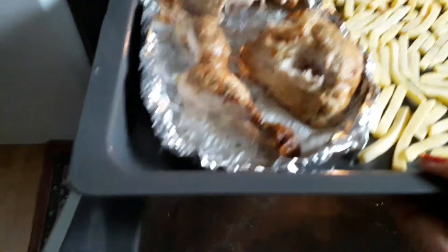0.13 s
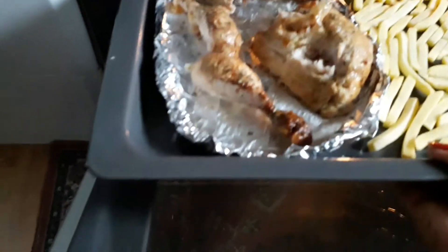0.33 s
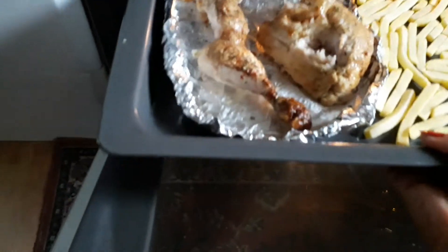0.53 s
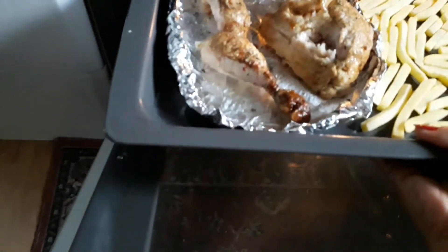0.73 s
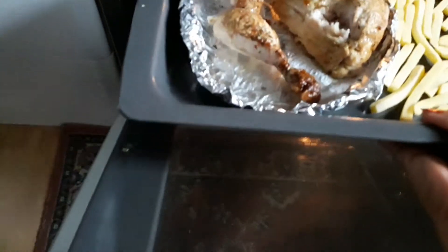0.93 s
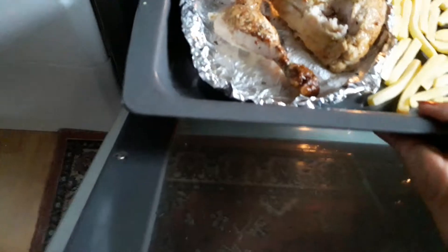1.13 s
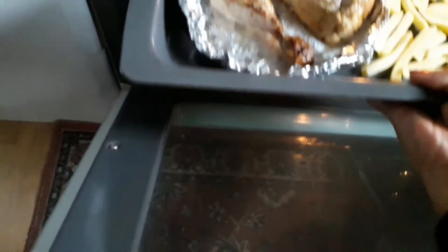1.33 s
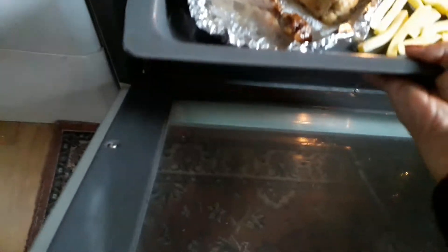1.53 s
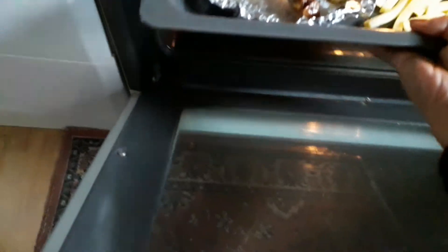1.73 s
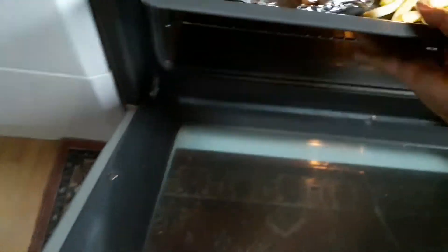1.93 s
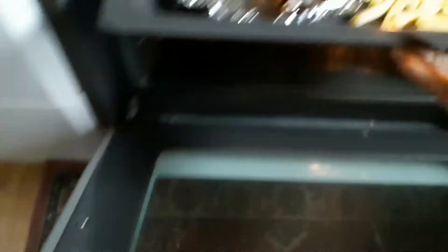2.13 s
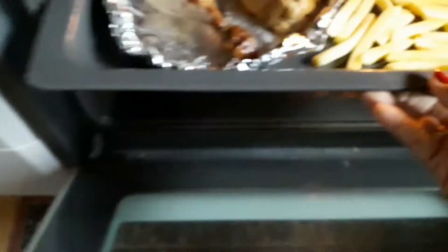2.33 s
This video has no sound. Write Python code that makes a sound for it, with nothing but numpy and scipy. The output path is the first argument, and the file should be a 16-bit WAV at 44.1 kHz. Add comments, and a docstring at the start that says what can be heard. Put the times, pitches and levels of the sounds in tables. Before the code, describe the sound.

Close up in a kitchen, a heavy sheet-metal tray bumps oven runners several times, clanks down hard, rattles faintly, then scrapes along with low rumble and rasp that end as bright gritty hiss over faint room rumble.

```python
"""A loaded metal baking tray is fed into an oven, heard close up on one small microphone.
Its rim knocks and rattles on the side runners, drops onto them with one loud clank and settles: each
blow sums dying sines and a decaying noisy crash. Then it slides in with a rumbling rasp that thins out
to a fine, gritty hiss, all three made of random tiny slips. The oven walls return short treble echoes,
and a faint room rumble lies beneath. Both channels are the same."""
import sys
import numpy as np
from scipy import signal
from scipy.fft import rfft, irfft
from scipy.io import wavfile

SR = 44100
rng = np.random.default_rng(int(sys.argv[2]) if len(sys.argv) > 2 else 0)


def persist_wave(psi):
    """Save psi, clipped to +-1, as 16-bit WAV."""
    counts = np.round(np.clip(psi, -1, 1) * 32767).astype(np.int16)
    wavfile.write(sys.argv[1], SR, np.atleast_2d(counts).T)


N = 105840

# Knocks of the rim on the runners; the four levels apply before the rise and decay:
# start_s, boom_db, clank_db, clash_db, tick_db, thump_pitch_hz, ping_pitch_hz, ping_level_db
KNOCKS = [(0.001, -31, -35, -41, -49, 325, 3330, -43), (0.029, -34.5, -38, -41.5, -48.5, 440, 2920, -44),
          (0.058, -29, -29, -31, -34.5, 336, 1070, -26), (0.1182, -28.5, -30.5, -44, -46, 201, 1090, -38),
          (0.2139, -24, -24, -35, -35, 329.3, 1840, -29.5),
          (0.2342, -26, -24.5, -26.5, -33, 345, 3330, -51), (0.2637, -22, -28, -24, -28.5, 268, 4540, -40),
          (0.294, -38, -64, -42, -41, 203, 9850, -38.5), (0.3414, -31, -34.5, -43.5, -63, 186, 1810, -40),
          (0.497, -12.5, -18.5, -19.5, -18, 240.7, 1370, -23),
          (0.5, -16.5, -24.5, -20.5, -27, 107.8, 3280, -22.5), (0.518, -28, -23, -36, -26, 246, 10300, -29),
          (0.525, -22.5, -31, -25, -25.5, 123, 2495, -15), (0.553, -37, -49, -36, -36, 236, 2570, -33),
          (0.588, -34.5, -39.5, -42.5, -38.5, 120, 9400, -45), (0.723, -61, -52, -77, -52, 237, 2760, -51),
          (0.8731, -25.5, -43, -30.5, -40, 172, 2290, -32.5), (0.892, -42, -32, -48, -38, 363, 3640, -36),
          (0.9148, -30, -36, -41, -40.5, 113, 2730, -42), (0.981, -34.5, -36.5, -66, -58, 193, 1460, -35),
          (1.0127, -48, -40.5, -35, -40.5, 122, 3840, -48), (1.109, -45, -50, -49.5, -46, 190, 3880, -45),
          (1.123, -40.5, -46, -38, -58, 171, 3870, -40.5), (1.2868, -77, -73, -49.5, -40, 214, 3430, -51),
          (1.648, -46, -65, -69, -60, 160, 1540, -68), (1.696, -58, -45, -46, -48, 112, 2130, -41.5),
          (1.975, -51, -54, -70, -56, 193, 1527, -46.5)]
# Boom, clank, clash and tick ranges of a crash:
# low_edge_hz, high_edge_hz, rise_s (time constant), first_t60_s, tail_level_db, tail_t60_s
CRASH_RANGES = [(80.3, 792, 0.0026, 0.25, -15, 0.62), (608, 3100, 0.00054, 0.045, -6, 0.2),
                (2600, 5820, 0.0014, .06, -9, 0.19), (6310, 46000, 0.00028, 0.033, -8, 0.16)]
# Colour of the dense ringing of tray and oven walls: pitch_hz, relative_level_db (per Hz)
SHEET_COLOUR = [(40, -21.5), (115, -0.5), (170, 0), (270, -5), (390, -8.5), (540, -9.5), (680, -22),
                (1000, -12.5), (1400, -13.5), (2000, -18.5), (2700, -18), (3800, -16.5), (5200, -20.5),
                (7500, -24), (10000, -22), (15500, -34.5)]
# Bending modes of the loaded tray: pitch_hz, level_db, t60_s
BENDING_MODES = [(104.2, -7.5, 0.15), (125.15, -8, 0.51), (141.4, -13, 0.31), (187.4, -22, 1),
                 (223.7, -15, 0.62), (233.5, -16.5, 0.54), (245.4, -9.5, 0.29), (280.7, -18.5, 0.56),
                 (350.3, -13, 0.29), (422.3, -17.5, .35), (547.2, -9.5, .22), (569.7, -17.5, .2)]
# Higher modes of the sheet and its rim: pitch_hz, level_db, t60_s
CLANG_MODES = [(972, -25.5, 0.14), (1111, -15.5, 0.19), (1198, -24.5, 0.19), (1315, -21.5, 0.13),
               (1555, -18, 0.21), (1880, -17, 0.36), (1940, -28, .15), (2415, -32.5, 0.6), (2603, -18, .18),
               (2900, -19.5, 0.14), (2980, -16, 0.16), (3496, -22.5, .24), (3710, -22, 0.26),
               (4880, -22, .2)]
# Low rumble of the sliding tray, over time: time_s, level_db
RUMBLE_LEVEL = [(0, -50.5), (.16, -40.5), (.21, -70), (.7, -62), (.85, -46), (1.15, -47.5), (1.38, -56.5),
                (1.58, -50.5), (1.68, -44.5), (1.86, -50.5), (1.93, -42), (2.0, -42), (2.05, -55),
                (2.13, -55), (2.2, -69), (2.4, -74.5)]
# Its spectrum: pitch_hz, relative_level_db (per Hz)
RUMBLE_COLOUR = [(25, -24), (55, -23.5), (95, 3), (120, -1.5), (145, -6), (190, 1.5), (290, -6.5),
                 (400, -15.5), (560, -19), (800, -28.5), (2000, -62)]
# Rasp of the sliding tray, over time: time_s, level_db
RASP_LEVEL = [(0, -46), (.1, -81), (.2, -56.5), (.42, -52), (.74, -59), (.85, -54), (1.1, -56.5),
              (1.28, -53.5), (1.35, -55), (1.43, -55), (1.48, -51), (1.65, -47), (1.73, -44.5), (1.93, -45),
              (2.02, -50), (2.1, -67), (2.2, -77.5), (2.4, -79)]
# Its spectrum: pitch_hz, relative_level_db (per Hz)
RASP_COLOUR = [(200, -11.5), (550, 3.5), (750, -2), (1200, 3.5), (1520, 2), (1750, 0), (2250, 0.5),
               (3000, -0.5), (4200, -1), (6500, -8), (10000, -13.5), (15500, -21.5)]
# Fine hiss of the sliding tray, over time: time_s, level_db
HISS_LEVEL = [(0, -81), (.19, -75), (.33, -61.5), (.7, -61), (.86, -59), (.93, -47), (1.09, -53),
              (1.13, -45.5), (1.21, -55.5), (1.25, -45), (1.34, -55.5), (1.38, -50), (1.43, -53.5),
              (1.66, -48.5), (1.8, -42.5), (2.05, -42), (2.12, -38.5), (2.4, -47.5)]
# Its spectrum: pitch_hz, relative_level_db (per Hz)
HISS_COLOUR = [(200, -25.5), (1000, -33.5), (2200, -19), (3500, -11), (5200, -4), (7000, -2), (8200, -3.5),
               (9900, 4), (11500, 1), (12900, 4.5), (14500, -1.5), (15700, 0.5)]
# Modes of the runners, which sing under the sliding rim: pitch_hz, level_db, t60_s
RUNNER_MODES = [(1154, -5.5, 0.24), (1524, 1, 0.47), (1937, -4, 0.56), (2040, -1.5, .2), (2275, -3, 0.29),
                (2340, -1.5, .2), (3580, -5.5, 0.2)]
# Near echoes off the oven walls: delay_s, level_db
WALL_ECHOES = [(.0013, -19), (.0031, -18), (.0044, -18), (.0071, -18)]
# Spectrum of the room rumble: pitch_hz, relative_level_db (per Hz)
ROOM_COLOUR = [(20, 12), (50, 1), (130, -4.5), (250, -8), (600, -27), (3000, -36.5)]

BEND_RISE_S, PING_RISE_S = 0.0062, 0.0006  # time constants
THUMP_DB, THUMP_T60_S, PING_T60_S = 0, 0.15, 0.049
DENSE_MODES_COUNT, WASH_DB, BOOM_WASH_DB = 800, -6.5, -1  # crash: noise share, trim of its boom range
GRAINS_PER_S, CATCHES_PER_S, CATCH_T60_S = 7000, 41, 0.031
CATCH_DB, RASP_RING_DB = -4, -9  # shares before the mixes are levelled
PRESSURE_RATE_HZ, FLICKER_RATE_HZ = 82, 150
ECHO_ABOVE_HZ, ROOM_DB = 3500, -63
LOW_CUT_HZ, CUTOFF_HZ = 61, 15900  # edges of the microphone and of the final band limit


def amp(db):
    """Decibels to gain."""
    return 10 ** (np.asarray(db) / 20)


def unit(x):
    """Scales to rms 1."""
    return x / np.sqrt(np.mean(x ** 2) + 1e-20)


def add(mix, start_s, sound):
    """Mixes a sound in at start_s, cut off at the end of the mix."""
    part = mix[max(round(start_s * SR), 0):][:len(sound)]
    part += sound[:len(part)]


def fade(t, t60):
    """Exponential decay that falls by 60 dB in t60 seconds."""
    return np.exp(-np.log(1000) * t / t60)


def rise(t, time_s):
    """Soft onset, approaching 1 with the time constant time_s."""
    return 1 - np.exp(-t / time_s)


def colour(x, points):
    """Filters x by a curve of pitch_hz, relative_level_db points, at rms 1."""
    hz, db = np.transpose(points)
    f = np.fft.rfftfreq(len(x), 1 / SR)
    gain = amp(np.interp(np.log(f + 1), np.log(hz), db))
    return unit(irfft(rfft(x) * gain, len(x)))


def band(x, low_hz, high_hz):
    """Keeps one range with soft edges, at rms 1."""
    f = np.fft.rfftfreq(len(x), 1 / SR) + 1
    gain = ((1 + (low_hz / f) ** 8) * (1 + (f / high_hz) ** 12)) ** -0.5
    return unit(irfft(rfft(x) * gain, len(x)))


def ring(modes, t, uneven_db):
    """Dying sines of alternating sign; each blow shares its force a little differently among them."""
    out = np.zeros(len(t))
    for k, (hz, db, t60) in enumerate(modes):
        gain = (-1) ** k * amp(db + uneven_db * rng.standard_normal())
        out += gain * fade(t, t60) * np.sin(2 * np.pi * hz * t)
    return np.sqrt(2) * out


def sheet_crash(dense_bins, gains, t):
    """Crowded sheet modes and noise, split into ranges that each die fast, then as an oven cavity tail."""
    lines = np.zeros(SR // 2 + 1, complex)
    lines[dense_bins] = np.exp(2j * np.pi * rng.random(len(dense_bins)))
    wash = amp(WASH_DB) * rng.standard_normal(SR)
    crash = colour(unit(irfft(lines)) + wash, SHEET_COLOUR)
    range_gains = gains * amp([BOOM_WASH_DB, 0, 0, 0])
    out = np.zeros(SR)
    for gain, (low, high, rise_s, first_t60, tail_db, tail_t60) in zip(range_gains, CRASH_RANGES):
        decay = np.hypot(fade(t, first_t60), amp(tail_db) * fade(t, tail_t60))
        out += gain * band(crash, low, high) * rise(t, rise_s) * decay
    return out


def knock(dense_bins, levels_db, thump_hz, ping_hz, ping_db):
    """One blow: thump and ping of the struck spot, the tray's clear modes and the sheet's crash."""
    t = np.arange(SR) / SR
    gains = amp(levels_db)
    boom, clank, clash, _ = gains
    low_modes = BENDING_MODES + [(thump_hz, THUMP_DB, THUMP_T60_S)]
    bends = boom * rise(t, BEND_RISE_S) * ring(low_modes, t, uneven_db=2)
    clangs = np.sqrt(clank * clash) * ring(CLANG_MODES, t, uneven_db=0.5)
    ping = rise(t, PING_RISE_S) * ring([(ping_hz, ping_db, PING_T60_S)], t, uneven_db=3)
    return bends + clangs + ping + sheet_crash(dense_bins, gains, t)


def knocks():
    """All blows of the rim, ringing the same crowd of sheet modes."""
    # one mode at random in each equal step of pitch; bins are 1 Hz apart in a one-second sound
    places = np.arange(DENSE_MODES_COUNT) + rng.random(DENSE_MODES_COUNT)
    dense_bins = (places * CUTOFF_HZ / DENSE_MODES_COUNT).astype(int)
    out = np.zeros(N)
    for start_s, *levels_db, thump_hz, ping_hz, ping_db in KNOCKS:
        add(out, start_s, knock(dense_bins, levels_db, thump_hz, ping_hz, ping_db))
    return out


def level(points):
    """Gain over time from time_s, level_db points."""
    return amp(np.interp(np.arange(N) / SR, *np.transpose(points)))


def wander(rate_hz):
    """Random motion of rms 1, fading out above about rate_hz."""
    f = np.fft.rfftfreq(N, 1 / SR)
    gain = np.exp(-(f / rate_hz) ** 2) * (f > 0)
    return unit(irfft(rfft(rng.standard_normal(N)) * gain, N))


def slips(per_s, spread_db):
    """Tiny slips at random times, of uneven size and random sign."""
    happens = rng.random(N) < per_s / SR
    size = amp(spread_db * np.minimum(rng.exponential(1, N), 2))
    return happens * size * rng.choice([-1, 1], N)


def slide_rumble(pressure):
    """Dense slips shake the tray into a low rumble."""
    rumble = colour(slips(GRAINS_PER_S, spread_db=4), RUMBLE_COLOUR)
    return rumble * amp(pressure) * level(RUMBLE_LEVEL)


def slide_rasp(pressure, t):
    """Dense slips make a rasp and ring the runners."""
    grit = unit(slips(GRAINS_PER_S, spread_db=2.5))
    ringing = unit(signal.fftconvolve(grit, ring(RUNNER_MODES, t, uneven_db=1))[:N])
    rasp = colour(grit, RASP_COLOUR) + amp(RASP_RING_DB) * ringing
    return rasp * amp(0.7 * pressure) * level(RASP_LEVEL)


def slide_hiss(pressure, t):
    """Dense slips and steady noise hiss, with sparser catches crackling as short noise bursts."""
    burst = rng.standard_normal(len(t)) * fade(t, CATCH_T60_S)
    catches = signal.fftconvolve(slips(CATCHES_PER_S, spread_db=3.5), burst)[:N]
    grit = unit(slips(GRAINS_PER_S, spread_db=6.5))
    hiss = colour(grit + rng.standard_normal(N) + amp(CATCH_DB) * unit(catches), HISS_COLOUR)
    flicker_db = 0.81 * pressure + 1.1 * wander(FLICKER_RATE_HZ)
    return hiss * amp(flicker_db) * level(HISS_LEVEL)


def slide():
    """The tray rubbing on its runners: one wandering pressure sways rumble, rasp and hiss."""
    t = np.arange(SR // 4) / SR
    pressure = wander(PRESSURE_RATE_HZ)
    return slide_rumble(pressure) + slide_rasp(pressure, t) + slide_hiss(pressure, t)


def room_rumble():
    """Faint steady noise of the room, mostly deep bass."""
    return amp(ROOM_DB) * colour(rng.standard_normal(N), ROOM_COLOUR)


def oven(x):
    """The steel walls throw the treble straight back."""
    high_pass = signal.butter(2, ECHO_ABOVE_HZ, "high", fs=SR, output="sos")
    treble = signal.sosfilt(high_pass, x)
    out = x.copy()
    for delay_s, level_db in WALL_ECHOES:
        add(out, delay_s, amp(level_db) * treble)
    return out


def scene():
    """Knocks and sliding inside the oven, over the room rumble, the same in both channels."""
    tray = oven(knocks() + slide())
    return np.tile(tray + room_rumble(), (2, 1))


def record(dry):
    """A small microphone that loses the deep bass; then the full-scale limit and band limit."""
    low_cut = signal.butter(2, LOW_CUT_HZ, "high", fs=SR, output="sos")
    limited = np.clip(signal.sosfilt(low_cut, dry), -1, 1)
    low_pass = signal.firwin(511, CUTOFF_HZ, window=("kaiser", 9), fs=SR)
    return signal.oaconvolve(limited, low_pass[None], "same")


dry = scene()
out = record(dry)
persist_wave(out)
```